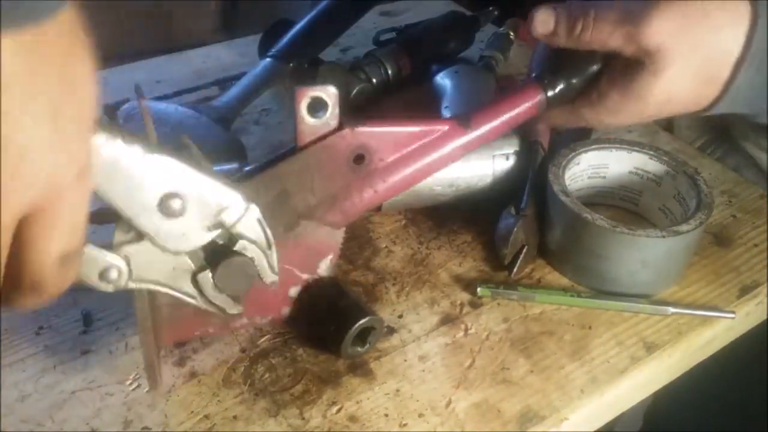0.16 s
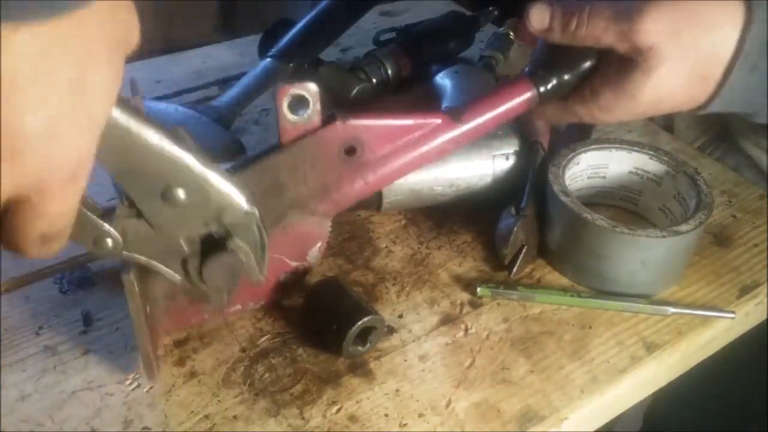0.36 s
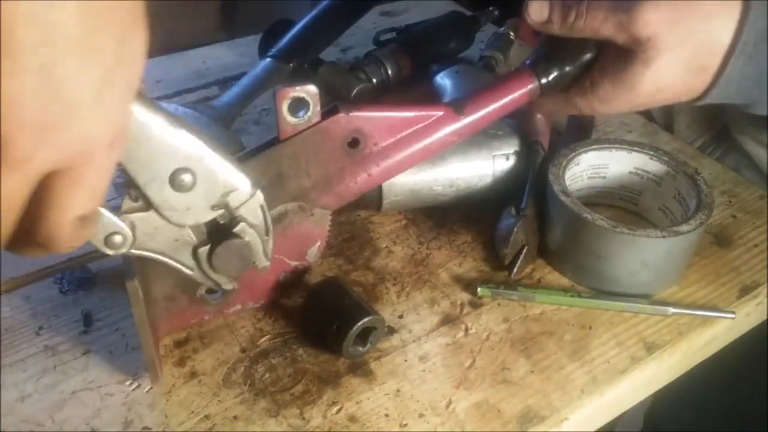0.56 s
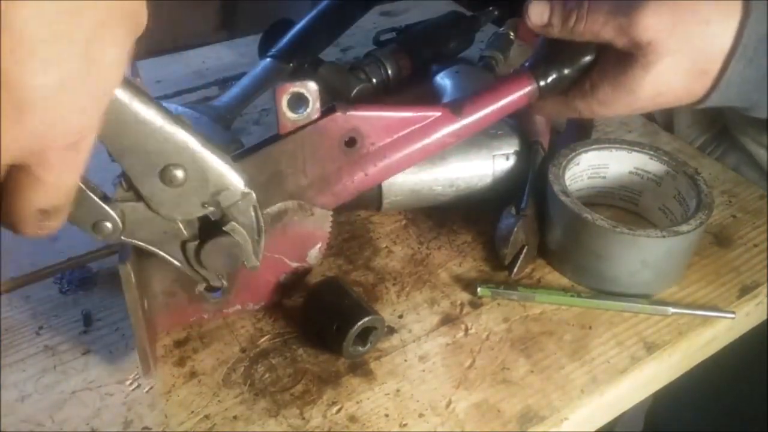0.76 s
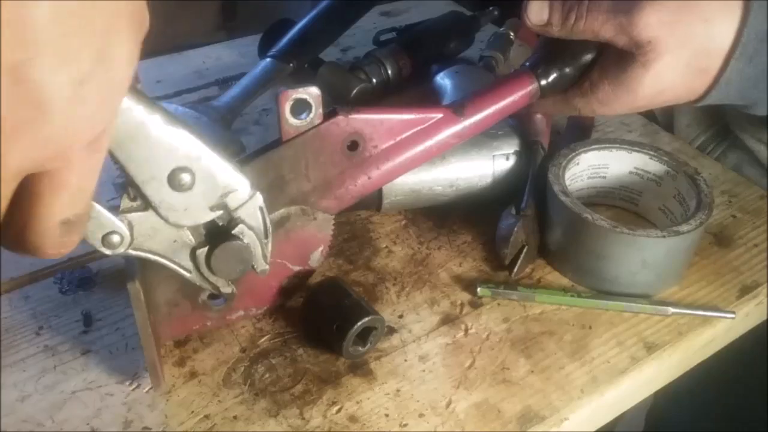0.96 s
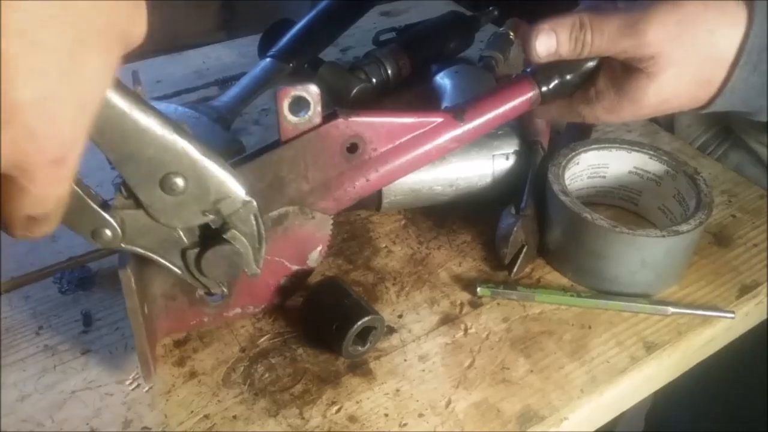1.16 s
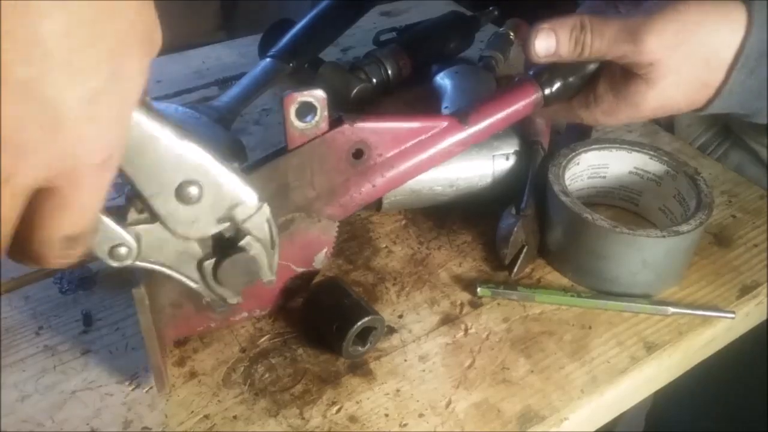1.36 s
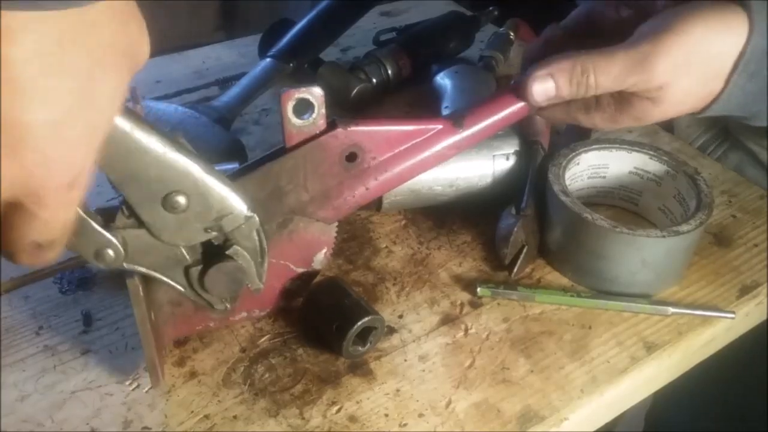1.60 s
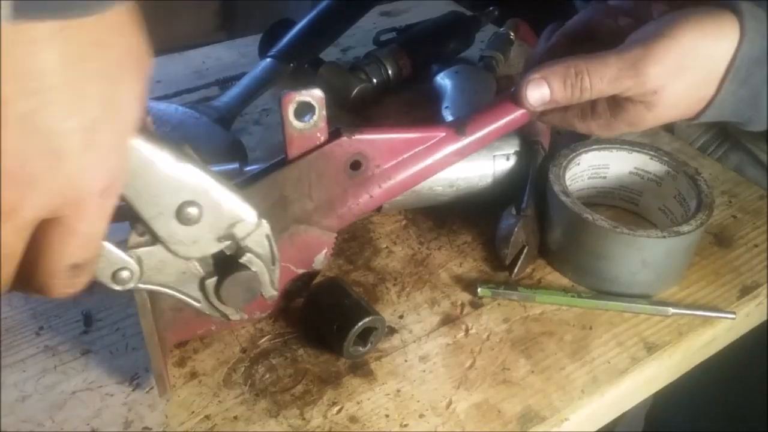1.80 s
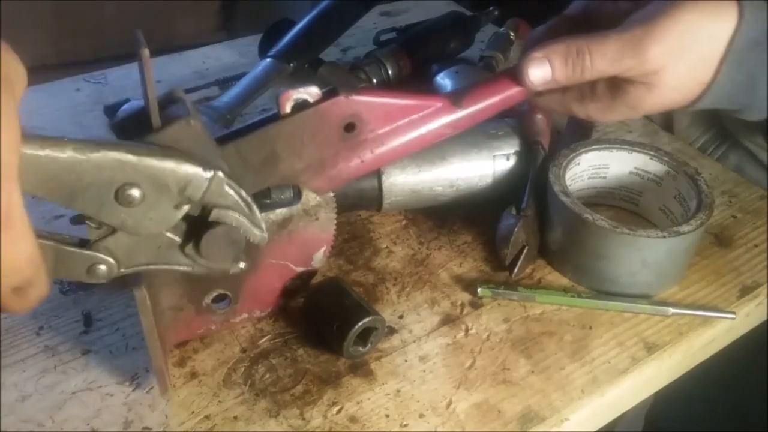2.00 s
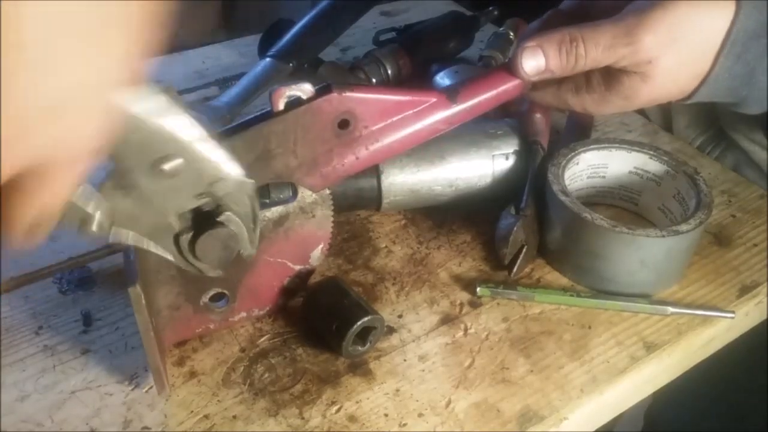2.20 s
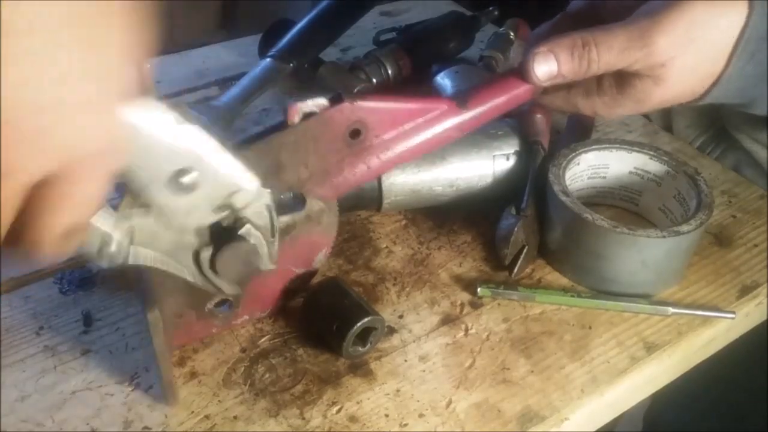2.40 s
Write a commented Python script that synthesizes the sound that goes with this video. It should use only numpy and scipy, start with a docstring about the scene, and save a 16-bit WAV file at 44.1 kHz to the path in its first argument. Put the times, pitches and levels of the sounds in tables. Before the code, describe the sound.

Close in a small workshop, pliers slip with sharp clinks and gritty scrapes while twisting a rusty pin. The loudest struggle comes first, then light taps, more slips, a thud on the wooden bench and faint closing taps.

```python
"""Locking pliers work a rusted steel pin to and fro in its sleeve, on a wooden workbench close by.
First comes the loudest struggle: rust grinds and squeaks, the jaws slip and clink, the steel frame thuds.
After about half a second the work eases into light clicks and taps as the frame rocks on the bench.
From just past one second the slips and scrapes pick up again, until a thud at about two seconds.
Two soft taps and a faint click end it. All along, a small workshop echoes over a low rumble and hiss."""
import sys
import numpy as np
from scipy import signal
from scipy.fft import rfft, irfft, next_fast_len
from scipy.io import wavfile

SR = 44100
rng = np.random.default_rng(int(sys.argv[2]) if len(sys.argv) > 2 else 0)


def unload_wav(signal):
    """Save mono or channel-first audio to the path in sys.argv[1] as 16-bit WAV at rate SR, clipped to [-1, 1]."""
    wavfile.write(
        sys.argv[1],
        SR,
        np.round(np.clip(np.atleast_2d(signal).T, -1, 1) * 32767).astype(np.int16),
    )


N = 108045
T = np.arange(SR // 2) / SR  # the half-second clock of one short sound

# Slips of the jaws: t/s, then level/dB of crack, clack, jaw, handle and lever, then share of ring time.
# Levels in all tables are relative: the functions add their own gains.
SLIPS = [(0.0461, -31, -34.5, -57, -47, -44.5, 1), (0.2029, -62.5, -39, -45, -40, -62, 0.69),
         (0.2113, -19, -29.5, -21, -32, -41.5, 0.94), (0.2927, -21.5, -32, -27, -29, -47, 0.57),
         (0.3759, -36.5, -60, -36.5, -36.5, -44.5, 0.96), (.420, -27, -32.5, -41, -38, -61, 0.75),
         (0.4445, -33.5, -44, -49, -60, -60, 1), (0.4603, -18, -21.5, -25, -23, -39, 0.93),
         (0.5096, -27.5, -22.5, -34, -37, -68, .8), (.5195, -30, -31, -34, -38, -64, 1),
         (0.5703, -20, -28, -23, -36, -53, 0.6), (.5967, -32, -37.5, -35, -50, -71, .7),
         (0.6002, -29, -53, -51, -52, -62, 0.85), (.6816, -39, -42.5, -45, -58.5, -66, 0.71),
         (0.749, -41.5, -37, -54, -61, -41.5, 0.4), (0.8134, -41.5, -43, -69, -74, -75, .5),
         (0.9279, -43, -52, -51.5, -59.5, -77, .8), (0.9894, -45.5, -52, -51, -70, -74, .7),
         (1.1404, -33, -38.5, -42, -55, -39.5, 0.49), (1.2154, -37, -43, -52, -66, -66, 1),
         (1.3369, -28.5, -42.5, -32.5, -44, -58, 0.82), (1.343, -29.5, -38.5, -44, -55, -52, 0.94),
         (1.3595, -35, -39.5, -39, -57, -48, 0.5), (1.527, -42.5, -50, -60, -60, -69, .5),
         (1.5337, -27, -36.5, -36, -38.5, -56, 0.94), (1.586, -30, -39.5, -33, -58, -69, .35),
         (1.7422, -31, -44, -41, -55, -76.5, 0.66), (1.7481, -32, -42, -35, -47, -64, 0.75),
         (1.765, -41, -39, -44, -62, -70, 0.62), (1.8002, -48.5, -32.5, -64, -60, -64, 0.31),
         (1.9482, -43, -40.5, -61, -65, -73.5, .6), (2.0001, -27.5, -35.5, -44, -38, -55, 1),
         (2.0626, -25.5, -36.5, -33.5, -41.5, -55, 0.9), (2.086, -34, -30.5, -46.5, -58, -59, 0.93),
         (2.4176, -50.5, -51, -59, -67, -71, .4)]
# Tone colours of the sharp snap, the bright crack and the duller clack: f/Hz, level/dB
SNAP_COLOUR = [(2000, -19), (5500, -8.5), (7000, 8.5), (15600, 0.5), (16800, -12.5)]
CRACK_COLOUR = [(1000, -28.5), (3000, -26.5), (5300, -26.5), (6600, 2.5), (9000, 6.5), (11000, 2.5),
                (13000, -13.5), (15000, 1), (16500, -26.5)]
CLACK_COLOUR = [(80, -32.5), (400, -10), (1000, -9.5), (1600, 2.5), (2400, 3.5), (3500, -2), (4600, -4.5),
                (6000, -3.5), (12000, -56)]
# Notes each part of the pliers rings with: f/Hz, level/dB, t60/s (time to fade by 60 dB)
JAW_NOTES = [(12120, -1.5, 0.07), (12312, -5.5, 0.094), (8250, -16.5, 0.13), (7200, -18.5, .07),
             (10010, -15.5, .05), (2420, -21, 0.16)]
HANDLE_NOTES = [(13720, -0.5, 0.06), (8980, -5.5, 0.028), (14750, -15.5, 0.055), (4590, -20.5, 0.14)]
LEVER_NOTES = [(6080, 4, 0.11), (8420, -4, 0.057), (6410, 2.5, 0.083), (4030, -12.5, 0.26),
               (2570, -13.5, 0.082), (1740, -12, 0.17)]
def pliers(attack_s=0.00053):
    """Each slip snaps, cracks, clacks on the frame and rings the steel; a tight grip cuts the ring short."""
    out = np.zeros(N)
    for start, crack_db, clack_db, jaw_db, handle_db, lever_db, sustain in SLIPS:
        snap_db = 1.44 * crack_db + 16.5  # in harder slips the snap grows faster than the crack
        add(out, start, amp(snap_db) * burst(SNAP_COLOUR, attack_s=0.00026, t60=0.004))
        add(out, start, amp(crack_db + 7) * burst(CRACK_COLOUR, attack_s, t60=0.013))
        add(out, start, amp(clack_db + 4.5) * burst(CLACK_COLOUR, attack_s, t60=0.028))
        add(out, start, amp(crack_db - 22.5) * overtones(attack_s))
        parts = (JAW_NOTES, jaw_db + 7), (HANDLE_NOTES, handle_db + 9), (LEVER_NOTES, lever_db + 5.5)
        for notes, db in parts:
            add(out, start, amp(db) * ring(notes, attack_s, sustain=sustain, width_hz=4))
    return out


def overtones(attack_s, count=12, t60=0.046):
    """Each point of contact brings out another handful of high notes."""
    notes = [(hz, 0, t60) for hz in rng.uniform(4080, 15150, count)]
    return ring(notes, attack_s, scatter_db=5.5)


# Strokes of the pin in its sleeve: t/s, length/s, grinding level/dB, grit level/dB
STROKES = [(0, 0.026, -42, -43.5), (0.054, 0.026, -48, -47.5), (0.112, 0.0022, -47, -52.5),
           (0.19, 0.006, -40, -44.5), (0.262, 0.027, -42, -37.5), (0.311, 0.02, -53, -38.5),
           (0.336, 0.013, -37.5, -39), (0.352, 0.046, -44, -37), (0.407, 0.085, -39.5, -35.5),
           (0.488, 0.059, -41, -35.5), (0.5071, 0.012, -24, -53), (0.577, 0.034, -41.5, -42),
           (0.653, 0.005, -34.5, -44), (0.72, 0.0025, -32, -37), (0.755, 0.037, -54, -46.5),
           (0.977, 0.0087, -44.5, -52), (0.99, 0.016, -51.5, -55.5), (1.114, 0.007, -43, -49),
           (1.205, 0.025, -52.5, -48), (1.28, 0.0042, -38.5, -52), (1.319, 0.0067, -50, -48),
           (1.353, 0.026, -44, -64), (1.535, 0.029, -56, -49.5), (1.63, 0.011, -52, -65),
           (1.717, 0.04, -59.5, -59), (1.746, 0.066, -44.5, -48.5), (1.802, 0.0071, -35, -48),
           (1.817, 0.02, -47.5, -52.5), (1.933, 0.055, -43, -41), (1.96, 0.0027, -38.5, -47),
           (1.969, 0.0026, -40, -44.5), (1.994, .028, -59, -40)]
# Tone colours of the lower grinding and the high grit: f/Hz, level/dB
GRIND_COLOUR = [(60, -13.5), (170, -1.5), (450, 5), (1100, 1.5), (1500, 3.5), (1950, -9), (2400, 10.5),
                (2750, -2.5), (3000, -4.5), (3700, 0.5), (4500, -7.5), (5500, -9), (12000, -33)]
GRIT_COLOUR = [(2000, -5), (5300, -12), (6400, -1.5), (8500, -1.5), (9700, 0.5), (11400, -13.5),
               (12150, -2), (12900, 2), (13650, -10.5), (14200, -13), (15700, -12.5), (16500, -29.5)]
# Notes of the sleeve: f/Hz, level/dB, t60/s
SLEEVE_NOTES = [(1450, -6.5, 0.02), (1700, -3.5, 0.018), (2420, -5, 0.042), (2908, -0.5, .026),
                (3210, -6, .017), (4300, -6.5, 0.021), (5520, -11.5, 0.043)]
def rust(grains_per_s=1500, spread_db=3.5, grain_t60=0.007):
    """Under each stroke, many tiny rust grains break at random and shake the sleeve."""
    out = np.zeros(N)
    for start, length, grind_db, grit_db in STROKES:
        breaks = rng.random(len(T)) < grains_per_s / SR
        strengths = breaks * amp(spread_db * noise())
        energy = signal.fftconvolve(strengths ** 2, fade(T, grain_t60) ** 2)[:len(T)]
        crackle = unit(np.sqrt(np.abs(energy)))  # the jumpy loudness of all grains together
        grind = unit(coloured(crackle * noise(), GRIND_COLOUR))
        grit = unit(coloured(crackle * noise(), GRIT_COLOUR))
        shaking = crackle * noise()
        sleeve_ring = ring(SLEEVE_NOTES, attack_s=0.0002, scatter_db=2, detune=0.02)
        sleeve = unit(irfft(rfft(shaking) * rfft(sleeve_ring), len(T)))
        rasp = amp(grind_db - 3) * grind + amp(grind_db - 5.5) * sleeve + amp(grit_db - 4) * grit
        rise_s = max(0.0015, 0.16 * length)  # long strokes slide in softly
        add(out, start, swell(length, rise_s, t60=0.042) * rasp)
    return out


# Moments when the pin sticks and squeaks: t/s, length/s, f/Hz, level/dB
PIN_SQUEAKS = [(0.204, 0.0095, 2368, -32.5), (0.266, .006, 2380, -37.5), (0.336, 0.016, 2414, -34.5),
               (0.372, 0.011, 4300, -46), (0.382, 0.0072, 4480, -36.5), (1.112, 0.0027, 2460, -39.5),
               (1.138, 0.014, 4520, -44.5), (1.349, 0.015, 2550, -40), (1.356, 0.013, 4300, -49),
               (1.937, 0.038, 2420, -45), (1.955, .03, 7200, -56.5), (1.96, 0.048, 4850, -51),
               (2.002, 0.0044, 2002, -38), (2.005, .015, 4500, -47)]
def squeaks():
    """The pin sticks and slips so fast that it briefly sings one unsteady note."""
    out = np.zeros(N)
    for start, length, hz, db in PIN_SQUEAKS:
        tone = np.sin(2 * np.pi * hz * T + wander(width_hz=120, count=1)[0])
        add(out, start, amp(db) * swell(length, rise_s=0.0018, t60=0.027) * unit(tone))
    return out


# The frame lands on the bench: t/s, frame level/dB, bench level/dB
LANDINGS = [(0.322, -28.5, -23.5), (.343, -38.5, -31), (0.374, -40, -64), (.424, -37.5, -37.5),
            (0.4643, -18.5, -33), (.724, -45, -49.5), (1.116, -48.5, -55.5), (1.365, -50, -49.5),
            (1.756, -56, -48.5), (1.803, -43.5, -38.5), (2.057, -40, -36.5), (2.0838, -27.5, -31.5)]
# Notes of the steel frame and of the wooden top: f/Hz, level/dB, t60/s
FRAME_NOTES = [(476, -5.5, 0.12), (766.6, -2, 0.086), (792.4, 1, 0.051), (905, -7, 0.093),
               (1350, -12, 0.11), (1700, -20.5, 0.14), (2355, -17, 0.053), (3040, -18, 0.092)]
BENCH_NOTES = [(97.7, -20.5, 0.048), (137, -5, 0.092), (164, 1.5, 0.073), (275.3, -2, 0.14),
               (357.9, 0, 0.11), (414, -13.5, 0.15), (470, -1.5, 0.044)]
# Tone colour of a landing's dull thump: f/Hz, level/dB
THUMP_COLOUR = [(25, -35), (50, -41), (90, -23.5), (140, -3.5), (400, -11), (620, -22.5), (850, -2.5),
                (1150, -25.5), (2500, -25.5), (8000, -63)]
def thuds():
    """The frame knocks on the bench and the wooden top booms."""
    out = np.zeros(N)
    for start, frame_db, bench_db in LANDINGS:
        add(out, start, amp(frame_db + 3.5) * ring(FRAME_NOTES, attack_s=0.0012))
        add(out, start, amp(bench_db + 4.5) * ring(BENCH_NOTES, attack_s=0.005))
        thump_db = (frame_db + bench_db) / 2 + 6.5
        add(out, start, amp(thump_db) * burst(THUMP_COLOUR, attack_s=0.0057, t60=0.084))
    return out


# Light taps of the rocking frame: t/s, level/dB
ROCKING = [(.762, -44.5), (.851, -61), (1.240, -48), (1.435, -51.5), (1.636, -44.5), (2.156, -54.5),
           (2.260, -50.5)]
# Hollow notes of a tap: f/Hz, level/dB, t60/s
HOLLOW_NOTES = [(469, 7.5, 0.077), (600.5, -1, 0.066), (850, -10, 0.039), (939, 1.5, 0.06),
                (1003, -1, 0.074), (1240, -15, 0.15)]
# Tone colour of the thump under a tap: f/Hz, level/dB
TAP_COLOUR = [(60, -13.5), (150, -2.5), (300, -8), (470, -2), (680, -9.5), (950, 1), (1300, -14),
              (6000, -34.5)]
def taps(bounce_s=0.008, bounce_db=-3.5):
    """The frame rocks softly and bounces once, with a rough, hollow ring over a dull thump."""
    out = np.zeros(N)
    for start, db in ROCKING:
        for delay, drop_db in (0, 0), (bounce_s, bounce_db):
            hollow = amp(4) * ring(HOLLOW_NOTES, attack_s=0.0011, width_hz=14, detune=0.012)
            thump = amp(7) * burst(TAP_COLOUR, attack_s=0.001, t60=0.063)
            add(out, start + delay, amp(db + drop_db) * (hollow + thump))
    return out


# How long the room's echo lasts at each pitch: f/Hz, t60/s
ECHO_TIMES = [(100, 0.17), (500, 0.49), (2500, 0.77), (7000, 0.51), (14000, 0.56)]
# Tone colour of that echo: f/Hz, level/dB
ECHO_COLOUR = [(100, 11.5), (600, -5.5), (2500, 0), (7000, -2.5), (14000, -8.5)]
def workshop(sound):
    """Sound bounces quickly off the bench and tools, then dies away in the room."""
    hz, t, bands = signal.stft(noise(), SR, nperseg=256)
    bands = bands * fade(t, along(ECHO_TIMES, hz)[:, None])
    tail = signal.istft(bands, SR, nperseg=256)[1][:len(T)]
    tail = np.pad(tail / np.linalg.norm(tail), 256)
    tail = coloured(tail, ECHO_COLOUR)[:len(T)]
    near = noise() * fade(T, t60=0.076) * (T > 0.004)  # the first bounce arrives after 4 ms
    echo = amp(-13) * tail + amp(-13.5) * near / np.linalg.norm(near)
    return signal.fftconvolve(sound, echo)[:N]


def fresh_echoes(sound, count):
    """Each stretch of the work gets a fresh random room echo, so no single pitch keeps ringing."""
    stretch = np.arange(N) * count // N
    return sum(workshop(sound * (stretch == k)) for k in range(count))


# Loudness of the hands and frame shifting on the bench: t/s, level/dB
RUMBLE_LEVELS = [(0, -52), (.09, -60.5), (.15, -69), (.22, -56.5), (.45, -45), (.69, -50.5), (.82, -63.5),
                 (0.972, -60), (1.059, -66.5), (1.15, -54.5), (1.3, -56.5), (1.45, -62.5), (1.58, -52),
                 (1.701, -60), (1.9, -61.5), (2.15, -49.5), (2.33, -78), (2.45, -59.5)]
# Tone colour of that rumble: f/Hz, level/dB
RUMBLE_COLOUR = [(25, -34), (55, -3), (90, 1.5), (170, -2.5), (250, -7.5), (380, -5), (600, -12),
                 (1500, -12), (5000, -30)]
def hands():
    """The gripped frame shifts on the bench with a low rumble."""
    times, db = np.transpose(RUMBLE_LEVELS)
    loudness = amp(np.interp(np.arange(N) / SR, times, db))
    return loudness * unit(coloured(noise(N), RUMBLE_COLOUR))


# Tone colour of the background hiss: f/Hz, level/dB
HISS_COLOUR = [(15, -32.5), (25, -3.5), (335, -12.5), (476, -15), (624, -19.5), (936, -3.5), (2000, -3),
               (2480, -3), (4490, -11.5), (16000, -5)]
def hiss():
    """A faint, steady hiss lies behind everything."""
    return amp(-67) * unit(coloured(noise(N), HISS_COLOUR))


def ring(notes, attack_s, scatter_db=2.2, sustain=1, width_hz=0, detune=0.002):
    """A struck part's fading notes; the changing grip shifts their level and pitch at every blow."""
    hz, db, t60 = np.transpose(notes)[:, :, None]
    gain = amp(db + scatter_db * noise(hz.shape))
    pitch = hz * (1 + detune * rng.uniform(-1, 1, hz.shape))
    phase = 2 * np.pi * pitch * T
    if width_hz:  # a slight random waver makes the fading notes sound rough
        phase = phase + wander(width_hz, count=len(hz))
    tones = gain * np.sin(phase) * fade(T, t60 * sustain)
    return tones.sum(axis=0) * (1 - np.exp(-T / attack_s))


def burst(colour, attack_s, t60):
    """A short puff of noise: the quickly dying shudder after a hit."""
    return unit(coloured(noise(), colour)) * swell(0, attack_s, t60)


def swell(length, rise_s, t60):
    """A loudness shape that rises, holds until `length` seconds, then fades."""
    return (1 - np.exp(-T / rise_s)) * fade(np.maximum(T - length, 0), t60)


def wander(width_hz, count):
    """Random phase drift that makes pure tones rough."""
    return np.cumsum(noise((count, len(T))), axis=1) * np.sqrt(2 * np.pi * width_hz / SR)


def noise(shape=len(T)):
    """White noise, half a second long by default."""
    return rng.standard_normal(shape)


def coloured(sound, colour):
    """Turn each frequency up or down as a tone colour table says."""
    hz = np.fft.rfftfreq(len(sound), 1 / SR)
    return irfft(rfft(sound) * amp(along(colour, hz)), len(sound))


def along(points, hz):
    """Read between the rows of a frequency table, with octaves evenly spaced."""
    freqs, values = np.transpose(points)
    return np.interp(np.log(hz + 1), np.log(freqs + 1), values)


def fade(t, t60):
    """Die away by 60 dB every t60 seconds."""
    return np.exp(-np.log(1000) * t / t60)


def amp(db):
    """Turn decibels into a multiplier."""
    return 10 ** (np.asarray(db) / 20)


def unit(sound):
    """Scale to an average (rms) level of 1."""
    return sound / np.sqrt(np.mean(sound ** 2) + 1e-20)


def add(track, start, sound):
    """Mix a sound in at `start` seconds."""
    i = max(round(start * SR), 0)
    track[i:i + len(sound)] += sound[:max(N - i, 0)]


def scene():
    """The work, its echoes and the background, in one channel."""
    work = pliers() + thuds() + taps() + rust() + squeaks()
    return (work + hiss() + fresh_echoes(work, count=8) + hands())[None]


def record(dry, low_hz=55, top_hz=16600):
    """The small microphone drops the deep bass and the very highest treble."""
    bass_cut = signal.butter(2, low_hz, "highpass", fs=SR, output="sos")
    sound = signal.sosfilt(bass_cut, dry)
    size = next_fast_len(N + SR // 2)
    below_top = np.fft.rfftfreq(size, 1 / SR) < top_hz
    return irfft(rfft(sound, size) * below_top, size)[..., :N]


dry = scene()
out = record(dry)
unload_wav(out)
```